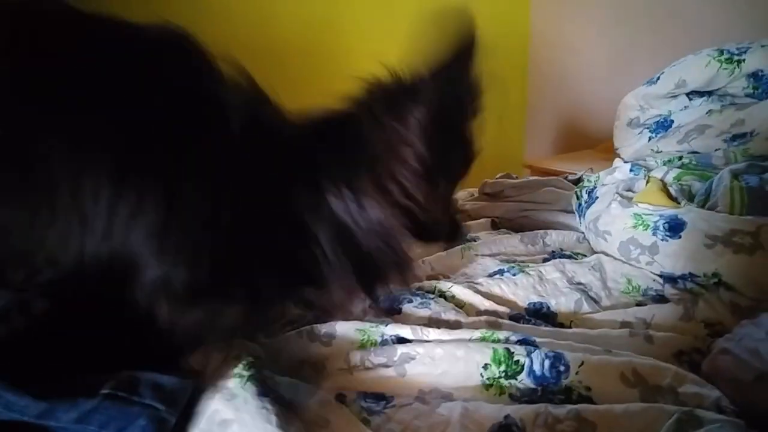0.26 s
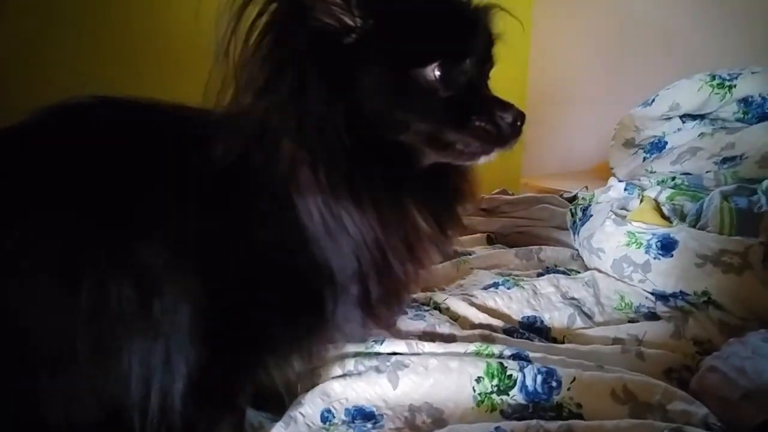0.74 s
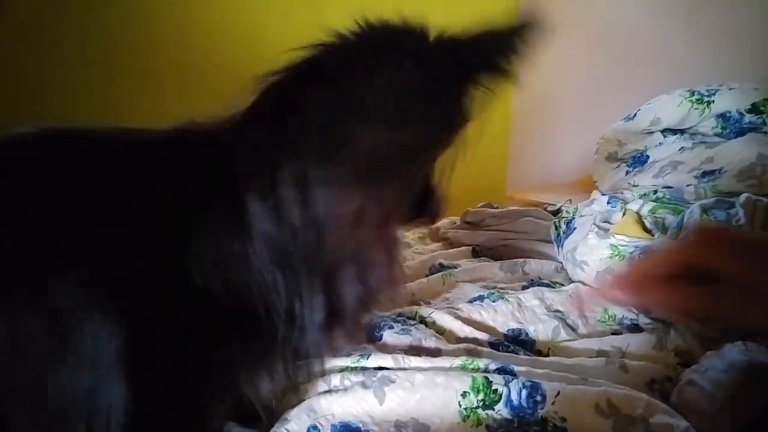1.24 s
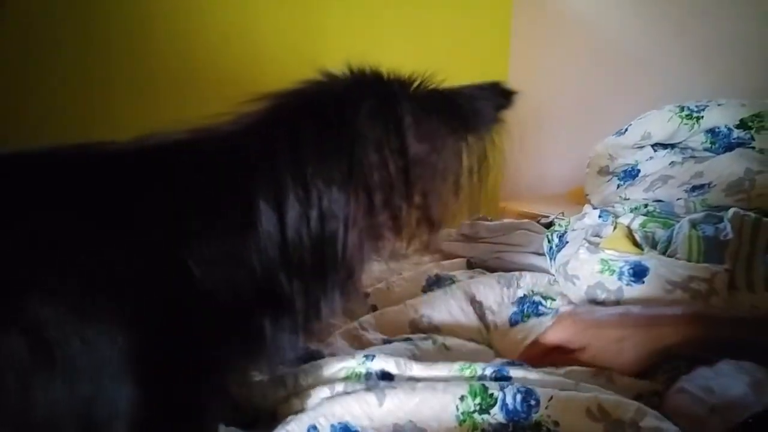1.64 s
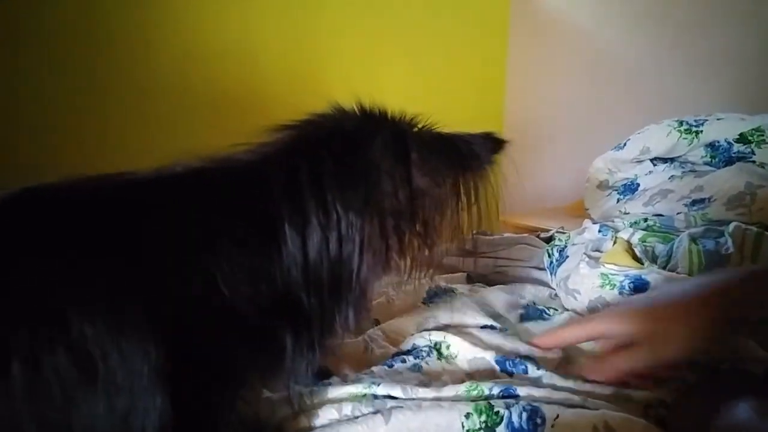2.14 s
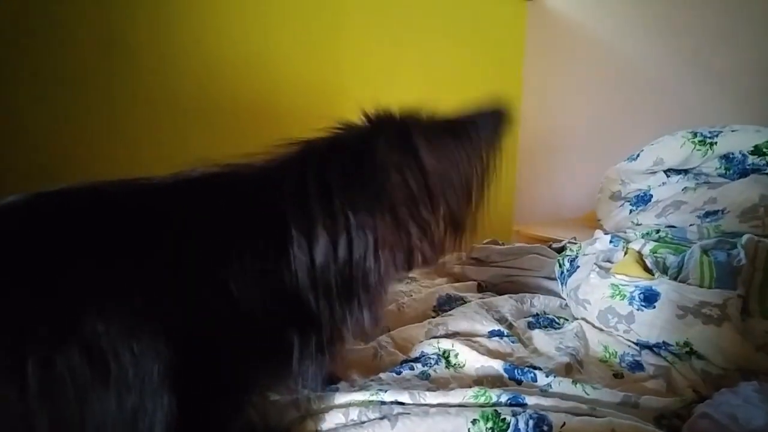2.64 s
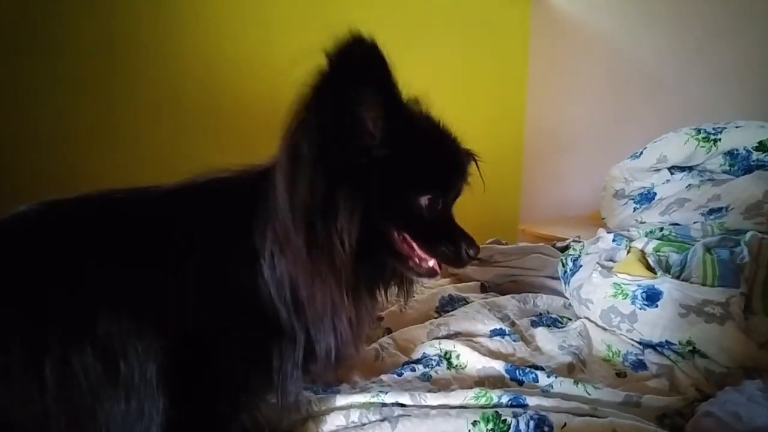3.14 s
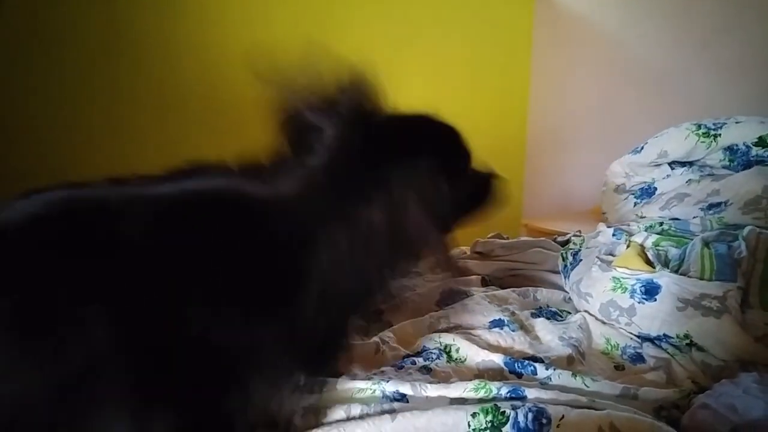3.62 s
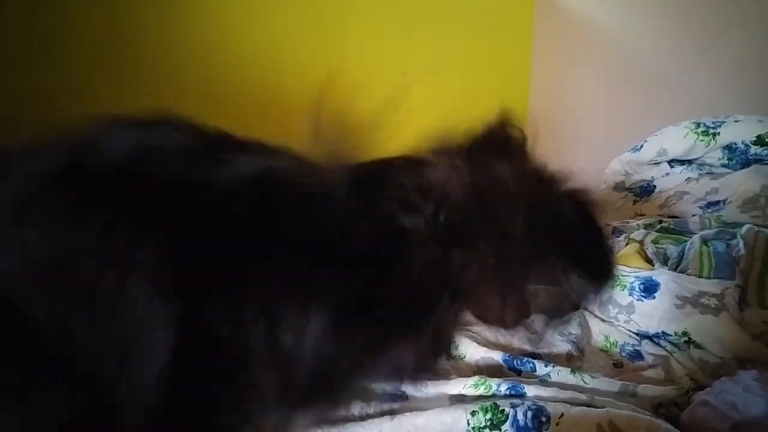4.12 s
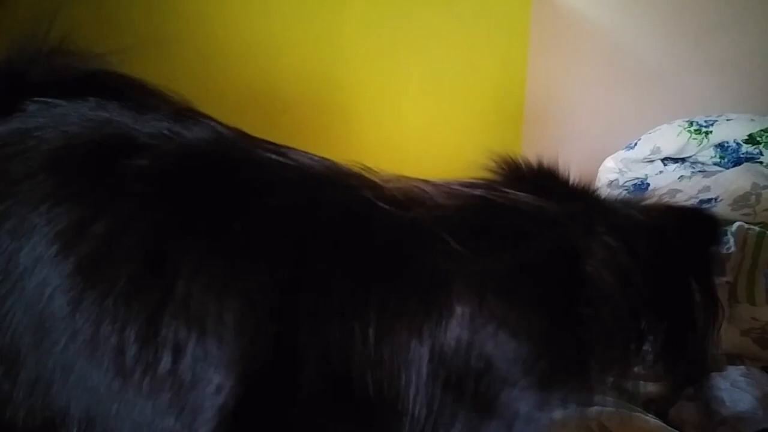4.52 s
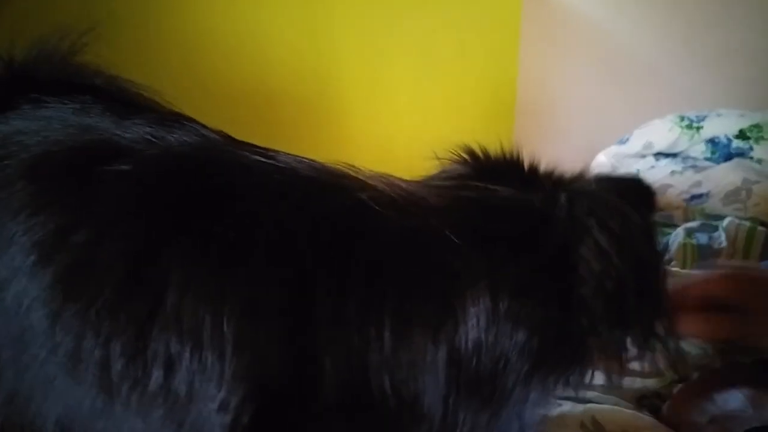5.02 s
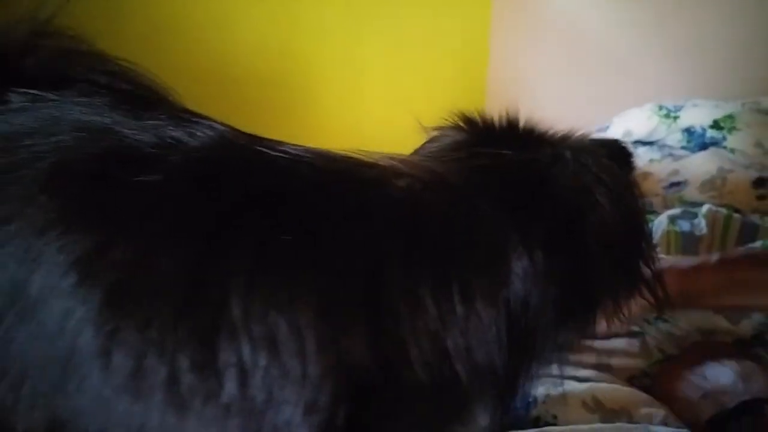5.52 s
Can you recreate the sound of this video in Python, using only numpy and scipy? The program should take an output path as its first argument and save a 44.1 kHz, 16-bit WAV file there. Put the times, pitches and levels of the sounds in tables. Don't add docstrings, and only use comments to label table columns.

```python
import sys
import numpy as np
from scipy import signal
from scipy.fft import rfft, irfft, next_fast_len
from scipy.io import wavfile
from scipy.ndimage import uniform_filter1d

SR = 44100
rng = np.random.default_rng(int(sys.argv[2]) if len(sys.argv) > 2 else 0)


def attenuation_scalar(level_db):
    decades = np.asarray(level_db, float) / 20
    return 10 ** decades


def to_wav(s):
    ch = np.atleast_2d(s).T
    pcm = np.round(np.clip(ch, -1, 1) * 32767)
    wavfile.write(sys.argv[1], SR, pcm.astype(np.int16))


N = 254456

# (time [s], hiss level [dB])
HUSH = [(0, -60), (.6, -66), (1.15, -68.5), (4.5, -69), (5.0, -76.5), (5.77, -74)]
STRAINED_SCATTER = .0015


def colour(table, hz, axis=1):
    points = np.transpose(table)
    return np.interp(np.log(np.maximum(hz, 1)), np.log(points[0]), points[axis])


def shaped(x, table):
    size = next_fast_len(x.shape[-1])
    hz = np.arange(size // 2 + 1) * SR / size
    return irfft(rfft(x, size) * attenuation_scalar(colour(table, hz)), size)[..., :x.shape[-1]]


def unit(x):
    return x / np.sqrt(np.mean(x ** 2))


def band(lo_hz, hi_hz, channels=1):
    edges = signal.butter(3, [lo_hz, hi_hz], "band", fs=SR, output="sos")
    return unit(signal.sosfilt(edges, rng.standard_normal((channels, N))))


def walk(rate):
    k = int(SR / rate)
    steps = np.repeat(rng.standard_normal(N // k + 1), k)
    return unit(uniform_filter1d(uniform_filter1d(steps, k), k)[:N])


def bumps(t, table):
    return sum(db * np.exp(-((t - at) / width) ** 2) for at, db, width in table)


def hiss():
    # (frequency [Hz], density [dB per Hz])
    hiss_curve = [(800, -24), (1300, -5.5), (2200, -9.5), (4300, -11.5), (5600, -11), (7200, -1),
                  (8800, -8.5), (10500, -16), (13000, -21), (15800, -25)]
    t = np.arange(N) / SR
    sniff_db = bumps(t, [(1.26, 9.5, 0.0488)])
    db = np.interp(t, *np.transpose(HUSH)) + sniff_db
    return unit(shaped(rng.standard_normal((2, N)), hiss_curve)) * attenuation_scalar(db + 0.7 * walk(18))


def stirring(t):
    # (time [s], peak above rest [dB], fade [dB per s])
    paws = [(.06, 21, 88), (0.479, 8, 48.5), (1.28, 7, 57), (1.73, -1, 40), (2.76, -0.5, 30),
            (3.25, 2.5, 20), (3.735, 25, 104), (3.92, 27.5, 118), (4.079, 21, 95), (4.27, 12.5, 120),
            (4.65, 8, 92), (5.5, 12, 0)]
    rise_db_per_s = 307
    shifts = [db - np.where(t < at, rise_db_per_s, fade) * abs(t - at) for at, db, fade in paws]
    return np.max(shifts, axis=0).clip(0)


def rustle():
    t = np.arange(N) / SR
    rest_db, stir_db = np.interp(t, *np.transpose(HUSH)), stirring(t)
    thud_db = rest_db - 2.5 + stir_db
    cloth_db = rest_db - 2 + 0.83 * stir_db
    thud = band(48, 74) + 0.82 * band(67, 180) + 0.25 * band(50, 170, channels=2)
    cloth = band(220, 420) + 0.14 * band(240, 420, channels=2)
    cloth = cloth + 1.2 * band(590, 900, channels=2) + 0.73 * band(300, 1300, channels=2)
    return thud * attenuation_scalar(thud_db + 0.73 * walk(10)) + cloth * attenuation_scalar(cloth_db + 3.5 * walk(35))


def ticks():
    # (time [s], level [dB], pitch [Hz], left minus right [dB])
    fibres = [(0.616, -57, 8740, 9), (0.718, -55.5, 8570, 4.5), (0.822, -56, 8770, 9),
              (0.8847, -59, 8810, -1), (1.2441, -52, 8110, -1.5), (1.272, -42.5, 8500, -7.5),
              (1.291, -51, 8780, -2.5), (1.481, -59, 8310, -0.5), (4.7725, -53, 4400, 4),
              (4.773, -55, 7620, 3)]
    out, u = np.zeros((2, N)), np.arange(1500) / SR
    for at, db, hz, pan_db in fibres:
        click = np.diff(rng.standard_normal(len(u) + 1))
        ring = (0.81 * np.sin(2 * np.pi * hz * u) + 0.83 * click) * attenuation_scalar(-60 * u / 0.021)
        i = int(at * SR)
        out[:, i:i + len(u)] += attenuation_scalar(db - 3.5 + np.array([[pan_db], [-pan_db]]) / 2) * ring
    return out


def scuffs():
    # (time [s], level [dB], pitch of the bump [Hz])
    scrapes = [(0.049, -30, 155), (0.499, -40, 149), (3.722, -34.5, 296), (3.769, -54, 161),
               (3.883, -37, 361), (3.927, -43, 172), (4.005, -36, 222), (4.039, -36, 140),
               (4.064, -35, 140), (4.099, -52, 200), (4.266, -42.5, 142)]
    out, u = np.zeros((2, N)), np.arange(1500) / SR
    swell = u / 0.0045 * np.exp(1 - u / 0.0032)
    for at, db, hz in scrapes:
        edges = signal.butter(3, [0.77 * hz, 2200], "band", fs=SR, output="sos")
        grit = signal.sosfilt(edges, rng.standard_normal(len(u)))
        puff = np.sin(2 * np.pi * hz * u) + 1.1 * grit
        i = int(at * SR)
        out[:, i:i + len(u)] += attenuation_scalar(db + 2) * puff * swell
    return out


def room(x, sent, wet_db, near_db):
    # (frequency [Hz], time to fall 60 dB [s])
    decay = [(300, 0.072), (900, 0.27), (3000, 0.32), (5000, 0.17), (9000, 0.27), (14000, 0.15)]
    t = np.arange(int(.5 * SR)) / SR
    tail = 0
    for hz in 250 * 2. ** np.arange(7):
        octave = [hz / np.sqrt(2), min(hz * np.sqrt(2), .45 * SR)]
        edge = signal.butter(2, octave, "band", fs=SR, output="sos")
        grain = signal.sosfilt(edge, rng.standard_normal((2, len(t))))
        tail = tail + grain * attenuation_scalar(-60 * t / colour(decay, hz))
    tail = tail * np.clip((t - .003) / 0.012, 0, 1)
    tail = tail / np.sqrt((tail ** 2).sum(1, keepdims=True))
    sparse = rng.standard_normal((2, len(t))) * (rng.random((2, len(t))) < .04)
    early = sparse * (t > .0006) * attenuation_scalar(-60 * t / 0.061)
    # (frequency [Hz], level [dB])
    echo_colour = [(300, 0.5), (1500, -4.5), (2600, -1.5), (3300, 3), (4300, -1.0), (9000, 4.5)]
    paths = shaped(attenuation_scalar(wet_db) * tail + attenuation_scalar(near_db) * early, echo_colour)
    direct = np.array([np.roll(x[0], 2), x[1]])
    return direct + signal.fftconvolve(sent.mean(0)[None], paths, axes=1)[:, :N]


def voice(calls, body, count, low, high, edge_s, slur_s, jitter, flutter_db, pan_db, air_db):
    # (frequency [Hz], level re body colour [dB])
    fold_air = [(2800, -14), (4600, -7), (10000, 3)]
    # (time [s], level [dB], half width [s])
    low_swells = [
        (0.099, 5, 0.014),
        (.135, -4, .014),
    ]
    # (time [s], depth [dB], half
    # width [s])
    wavers = [(2.299, 9, 0.0046), (2.337, 6.5, 0.022), (2.473, 6, .015), (2.539, 8, 0.021),
              (2.69, 3.5, 0.013), (2.77, 1.5, 0.037), (2.87, -3, 0.053), (2.96, -2.5, 0.039),
              (3.049, 2, 0.019), (3.19, 6, 0.013), (3.295, 7, 0.015), (3.365, -3.5, 0.026),
              (3.44, 3.5, 0.0083), (3.666, 9, 0.0039), (3.866, 3, 0.006), (3.912, 7.5, 0.0076),
              (3.945, 11.5, 0.00768), (3.974, -1, 0.017), (4.15, 13, 0.0047), (4.195, 2, 0.033)]
    usual_db = -22
    t = np.arange(N) / SR
    s, *columns = np.vstack(calls).T
    hz, effort_db = (uniform_filter1d(np.interp(t, s, c), int(slur_s * SR) + 1) for c in columns)
    low_db, high_db = (db + slope * (effort_db - usual_db) for db, slope in (low, high))
    low_db = low_db + bumps(t, low_swells)
    mid_db = -bumps(t, wavers)
    on = sum((t >= c[0][0] - .001) & (t < c[-1][0] + .002) for c in calls) > 0
    gate = uniform_filter1d(1. * on, int(edge_s * SR) + 1) ** 2
    phase = 2 * np.pi * np.cumsum(hz * (1 + jitter * walk(150))) / SR

    live = np.flatnonzero(gate > 0)
    slow = live[::16]
    k = np.arange(1, count + 1)[:, None]
    f = k * hz[slow]
    gain = attenuation_scalar(colour(body, f)) * (f < 16000)
    under, over = np.clip((3250 - f) / 500, 0, 1), np.clip((f - 6400) / 500, 0, 1)
    size = 0
    for zone, db in ((under, low_db), (1 - under - over, mid_db), (over, high_db)):
        zone_rms = np.sqrt((zone ** 2 * gain ** 2).sum(0) / 2 + 1e-9)
        size = size + zone * gain * attenuation_scalar(db[slow]) / zone_rms

    breath = unit(shaped(shaped(rng.standard_normal((2, N)), body), fold_air))
    out = breath * (1 + .5 * np.cos(phase)) * attenuation_scalar(air_db)
    waves = np.sin(k * phase[live] + 1.4 * k ** 2)
    for port, side in enumerate((.5, -.5)):
        chance = rng.standard_normal((count, N // 16 + 1))
        sway = uniform_filter1d(chance, 160, axis=1)[:, slow // 16] * np.sqrt(160 * f / 5000)
        heard = size * attenuation_scalar(side * (colour(body, f, axis=2) + pan_db) + flutter_db * sway)
        out[port, live] += (np.repeat(heard, 16, axis=1)[:, :len(live)] * waves).sum(0)
    return out * gate * attenuation_scalar(effort_db)


def grunt():
    # (time [s], pitch [Hz], level [dB])
    drop_off = [
        (0.179, 401, -4.5),
        (0.19, 351.8, -17.5),
        (0.205, 308, -13.5),
        (0.223, 290, -51.5),
    ]
    s, hz, db = np.transpose(drop_off)
    t = np.arange(N) / SR
    phase = 2 * np.pi * np.cumsum(np.interp(t, s, hz)) / SR
    gate = uniform_filter1d(1. * ((t > s[0]) & (t < s[-1])), 300)
    cycles = np.sin(phase) + attenuation_scalar(-2.5) * np.sin(2 * phase)
    return gate * attenuation_scalar(np.interp(t, s, db) - 3.5) * cycles


def yip():
    # (time [s], pitch [Hz], effort [dB])
    leap = [
        [(0.064, 597.7, -38.5), (0.082, 716, -23), (0.11, 923, -21), (0.124, 1045, -13), (0.138, 1106, -10.5),
         (0.15, 1046, -17.5), (0.166, 800, -23.5), (0.176, 730, -30.5), (0.19, 680, -37)],
    ]
    # (frequency [Hz], level [dB], left minus right [dB])
    yap = [(503, 3.5, -6), (1060, -11.5, -10), (1650, 7.5, 3), (2280, -12.5, -3), (3400, -21, 4.5),
           (4360, -3.5, -1), (5460, -7.5, -7.5), (7500, -21, 3.5), (9486, -39.5, 4), (15540, -53, -1.5)]
    return voice(leap, yap, count=24, low=(7.5, -.6), high=(-12, -.3), edge_s=0.014, slur_s=.009,
                 jitter=STRAINED_SCATTER, flutter_db=3.5, pan_db=3.8, air_db=-38)


def yelps():
    # (start [s], length [s], crest pitch [Hz], width of the pitch hump [s], effort [dB])
    humps = [
        (5.318, .088, 1396, .032, -17.5),
        (5.459, 0.081, 1956, .022, -17.5),
        (5.604, .082, 1495, .024, -18.5),
        (5.705, .032, 1163, .08, -25.5),
        (5.759, 0.045, 1494, .025, -17.5),
    ]
    # (frequency [Hz], level [dB], left minus right [dB])
    pressed = [(879.6, -9.5, -5), (1368, -9, -3.5), (2556, -12.5, 0), (3780, -8.5, 1.5), (4716, 7, -3),
               (5600, -2, -3), (6650, -9, 2.5), (8750, -23.5, 1), (11900, -25.5, -7), (15500, -45, 1)]
    rest_hz, crest_s, sag_hz_per_s = 1141, .036, 600
    u = np.linspace(0, 1, num=24)
    calls = []
    for start, length, crest_hz, width, db in humps:
        late = u * length - crest_s
        hz = rest_hz + (crest_hz - rest_hz) * np.exp(-(late / width) ** 2) - sag_hz_per_s * late
        calls.append(np.transpose([start + u * length, hz, db - 9 * u ** 4.5]))
    return voice(calls, pressed, count=14, low=(-6.5, -.15), high=(-8.5, -.1), edge_s=0.0025, slur_s=0.0025,
                 jitter=.005, flutter_db=2.32, pan_db=-2.5, air_db=-17.5)


def squeal():
    # (time [s], pitch [Hz], effort [dB])
    steps = [
        [(1.532, 1179, -14.5), (1.55, 1284, -18), (1.584, 1469, -15), (1.62, 1809, -16.5), (1.682, 1831, -16.5),
         (1.755, 2140, -17), (1.765, 2419, -14.5), (1.82, 2580, -17.5)],
        [(1.82, 2562, -16), (1.86, 2575, -19), (1.893, 2392, -14.5), (1.908, 2138, -18.5), (1.934, 1804, -23.5),
         (2.0, 1793, -26.5), (2.014, 1576, -27), (2.054, 1347, -32), (2.085, 809.4, -41)],
    ]
    # (frequency [Hz], level [dB], left minus right [dB])
    strained = [(900, -2.5, -1.5), (1599, -0.5, -8.5), (2560, -3.5, -5.5), (3613, -11, 6), (4830, 3.5, 9),
                (5574, -3.5, 0.5), (7260, -11.5, 4.5), (9470, -26.5, -5), (12500, -31.5, -0.5),
                (15500, -52, 0.5)]
    return voice(steps, strained, count=16, low=(-8.5, -.15), high=(-9, -.1), edge_s=0.0047, slur_s=.007,
                 jitter=STRAINED_SCATTER, flutter_db=1.83, pan_db=1.0, air_db=-26)


def whines():
    # (time [s], pitch [Hz], effort [dB])
    glides = [
        [(0.0, 1058, -30), (0.044, 1059, -33.5), (0.058, 990, -35)],
        [(0.468, 1091, -34), (0.492, 1090, -31), (0.53, 1042, -36.5), (0.552, 982, -38.5), (0.575, 851, -70)],
        [(2.13, 1134, -30.5), (2.158, 1199, -27), (2.2, 1327, -22.5), (2.27, 1217, -22.5), (2.33, 1183, -21.5),
         (2.45, 1151, -21), (2.62, 1122, -21.5), (3.0, 1107, -24.5), (3.36, 1081, -26)],
        [(3.36, 1081, -28), (3.64, 1074, -27), (3.695, 1101, -25.5), (3.728, 1171, -19.5), (3.8, 1123, -24),
         (3.9, 1090, -25), (4.13, 1065, -31.5), (4.33, 1035, -34.5), (4.43, 966, -43.5)],
        [(4.43, 951, -41), (4.49, 900, -63)],
    ]
    # (frequency [Hz], level [dB], left minus right [dB])
    body = [(800, -3, -6), (1200, -2, -9), (2260, -4.5, -3.5), (3280, -16.5, 1.5), (4400, -2.5, 6),
            (5520, -11.5, 3), (6480, -26, 4), (8500, -27.5, -5), (11160, -15.5, 7.5), (13300, -33, -4.5),
            (15500, -34.5, 0)]
    return voice(glides, body, count=17, low=(-7.5, -.3), high=(-17, .15), edge_s=0.003, slur_s=0.018,
                 jitter=.0002, flutter_db=-0.1, pan_db=0.4, air_db=-54)


def scene():
    whine, high_cries, bark, low_note = whines(), squeal() + yelps(), yip(), grunt()
    direct = whine + high_cries + bark + low_note
    sent = attenuation_scalar(-5) * whine + high_cries + attenuation_scalar(-5) * bark + attenuation_scalar(-4.0) * low_note
    dog = room(direct, sent, wet_db=-4.5, near_db=-12.0)
    return dog + rustle() + ticks() + scuffs() + hiss()


def notched(x):
    size = next_fast_len(N)
    hz = np.arange(size // 2 + 1) * SR / size
    dip = 1 - 0.48 * np.exp(-((hz - 3210) / 57) ** 2)
    return irfft(rfft(x, size) * dip, size)[:, :N]


def top_cut(x):
    return signal.sosfilt(signal.butter(12, 16660, fs=SR, output="sos"), x)


def record(dry):
    soft = np.tanh(notched(dry) / 1.8) * 1.8
    treble = signal.sosfilt(signal.butter(2, 5500, "high", fs=SR, output="sos"), soft)
    fold_hz = 48000 - 44100
    images = attenuation_scalar(-22) * treble * np.cos(2 * np.pi * fold_hz * np.arange(N) / SR)
    top = signal.butter(8, 15700, fs=SR, output="sos")
    return top_cut(signal.sosfilt(top, soft + images))


dry = scene()
out = record(dry)
to_wav(out)
```